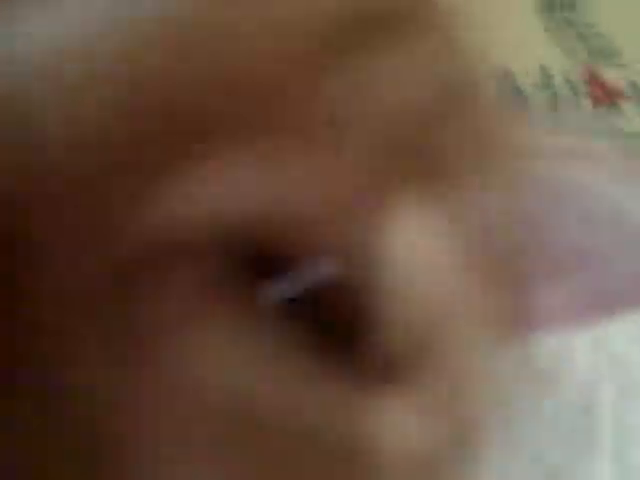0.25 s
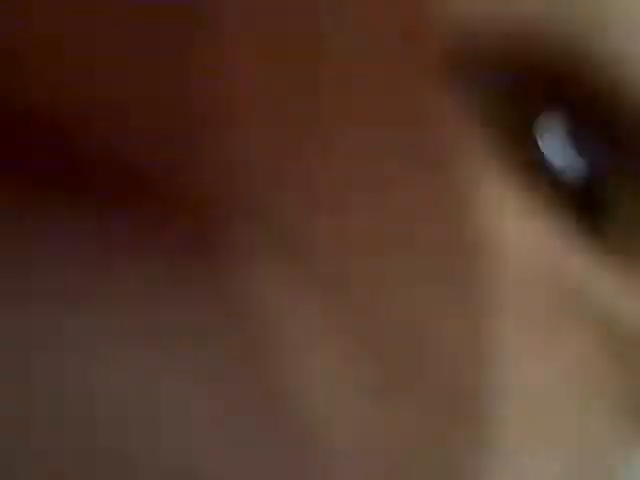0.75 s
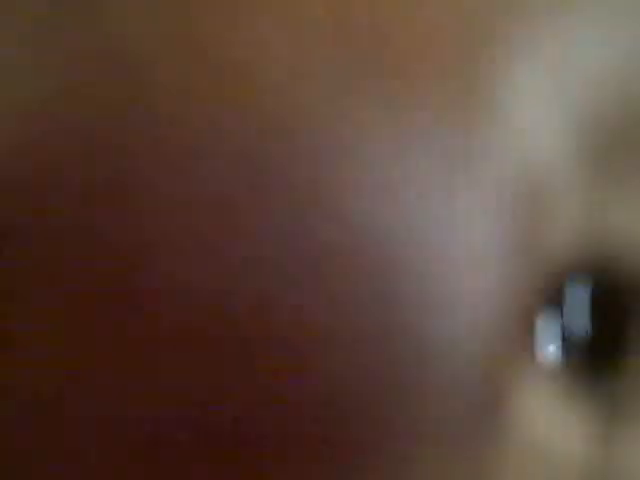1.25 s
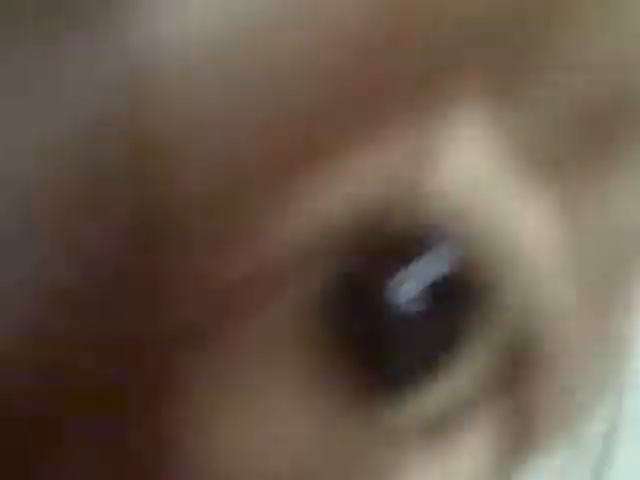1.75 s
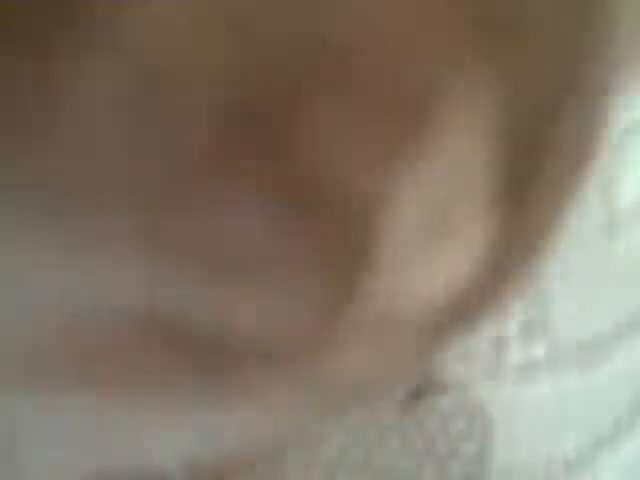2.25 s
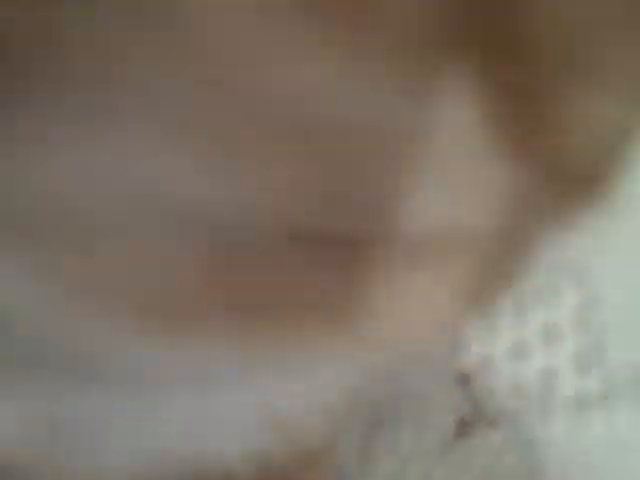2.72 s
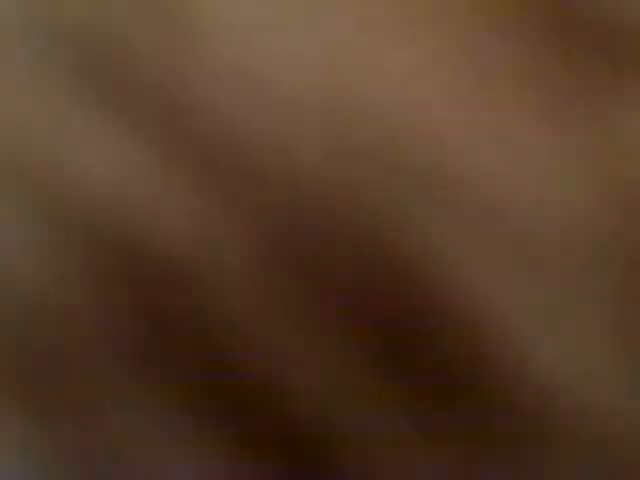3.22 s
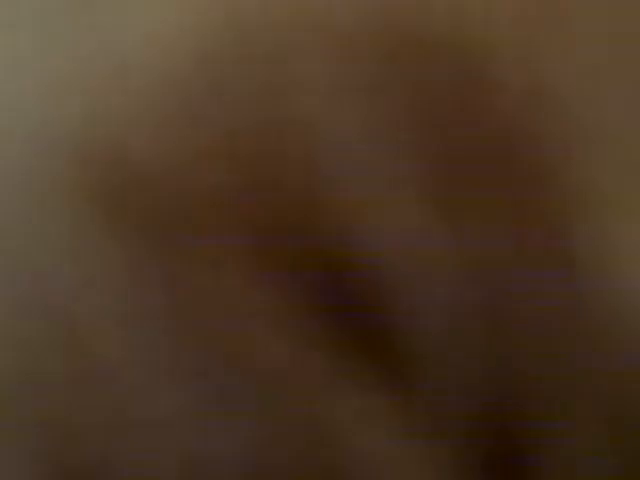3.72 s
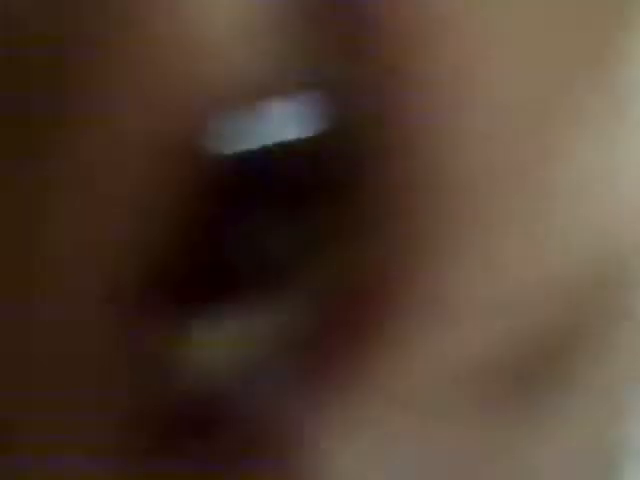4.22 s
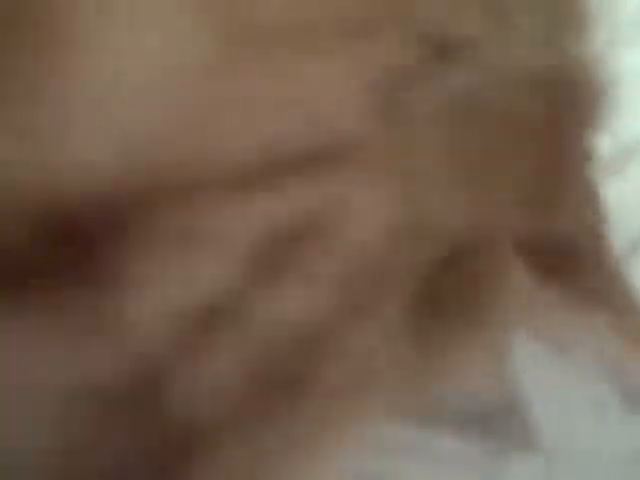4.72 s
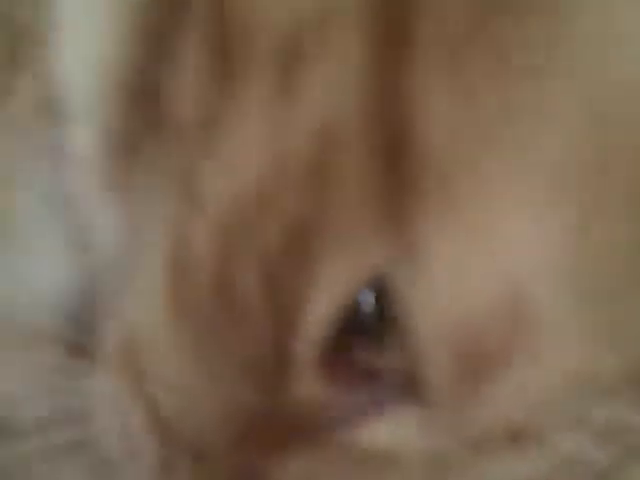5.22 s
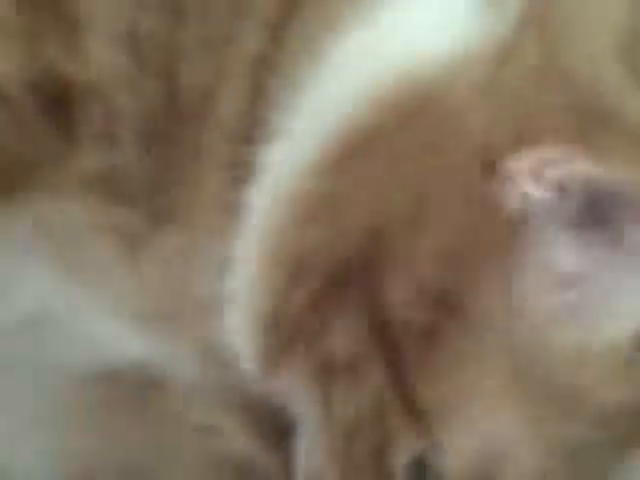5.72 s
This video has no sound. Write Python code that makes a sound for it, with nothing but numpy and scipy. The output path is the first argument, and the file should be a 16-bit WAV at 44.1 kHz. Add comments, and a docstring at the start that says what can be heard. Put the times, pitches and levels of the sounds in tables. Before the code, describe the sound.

Very close cat purring and short sniffs, broken by dull thumps and rubbing as its muzzle nudges the microphone.

```python
"""A cat purrs and sniffs on a bed, its nose almost touching a small camera.
Its larynx chops each breath into puffs that hiss through the nostrils while the chest throbs below.
Nuzzles and one long breath out buffet the microphone; fur scuffs on the case amid tiny bright ticks.
Behind the cat, the hand-held case rumbles and clicks twice over mains hum and a quiet room."""
import sys
import numpy as np
from scipy import signal
from scipy.fft import rfft, irfft, next_fast_len
from scipy.io import wavfile
from scipy.ndimage import map_coordinates

SR = 44100
rng = np.random.default_rng(int(sys.argv[2]) if len(sys.argv) > 2 else 0)


def materialize(psi):
    """Save the field psi as 16-bit PCM at rate SR to the path in sys.argv[1].

    A 1-D psi becomes a single channel; in a 2-D psi each row is a channel.
    """
    bounded = np.clip(np.atleast_2d(psi).T, -1, 1)
    quanta = np.round(bounded * 32767).astype(np.int16)
    wavfile.write(sys.argv[1], SR, quanta)


N = 262836


def amp(db):
    """Decibels to gain."""
    return 10 ** (np.asarray(db) / 20)


def unit(x):
    """x at rms 1."""
    return x / np.sqrt(np.mean(x ** 2) + 1e-20)


def clock():
    """The time of every sample, in seconds."""
    return np.arange(N) / SR


def filtered(x, response):
    """x through a filter given as a complex response of frequency."""
    size = next_fast_len(len(x) + 8192)
    return irfft(rfft(x, size) * response(np.fft.rfftfreq(size, 1 / SR)), size)[:len(x)]


def resonance(f, hz, width):
    """Causal response of one resonance, 1 at its centre."""
    return 1j * f * width / (hz * hz - f * f + 1j * f * width)


def coloured(x, eq):
    """x through an EQ curve of (freq_hz, gain_db) points, at rms 1."""
    hz, db = np.transpose(eq)
    return unit(filtered(x, lambda f: amp(np.interp(np.log(f + 1), np.log(hz), db))))


def noise(eq):
    """Coloured noise of rms 1."""
    return coloured(rng.standard_normal(N), eq)


def wobble(rate):
    """A smooth random curve, rate knots a second."""
    knots = rng.standard_normal(int(N * rate / SR) + 4)
    coarse = np.arange(0, N + 16, 16)
    return np.interp(np.arange(N), coarse, map_coordinates(knots, [coarse * rate / SR], mode="mirror"))


def gate(t, length, edge):
    """1 from t = 0 to length, with soft edges."""
    return (1 + np.tanh(t / edge)) * (1 + np.tanh((length - t) / edge)) / 4


def noise_band(hz, width):
    """Noise of rms 1 in one resonance whose centre may move from sample to sample."""
    phase = 2 * np.pi * np.cumsum(hz) / SR
    slow_noise = lambda: filtered(rng.standard_normal(len(hz)), lambda f: 1 / (1 + 1j * f / width) ** 2)
    return unit(slow_noise() * np.cos(phase) + slow_noise() * np.sin(phase))


def noise_bands(modes, bend):
    """Noise of rms 1 in several resonances that bend together."""
    return unit(sum(amp(db) * noise_band(hz * bend, width) for hz, width, db in modes))


# Room tone and microphone noise: freq_hz, gain_db
FLOOR_EQ = [(15, 0.5), (38, 9), (90, -12), (250, -8), (500, -13), (1000, -20), (1600, -25.5), (3000, -27.5),
            (4600, -28.5), (6300, -20.5), (7500, -25), (9000, -45)]

def room_tone(hum_hz=57.708, hum_db=-43.5, floor_db=-50):
    """Mains hum, slightly unsteady, over quiet room and microphone noise."""
    hum = np.sin(2 * np.pi * hum_hz * clock() + 0.11 * wobble(3)) * amp(.6 * wobble(4))
    return amp(hum_db) * unit(hum) + amp(floor_db) * noise(FLOOR_EQ)


# Low rumble on the microphone, also under the nuzzles and the purr: freq_hz, gain_db
BUFFET_EQ = [(12, -15), (28, -2.5), (60, 2.5), (120, -9), (190, -14.5), (380, -25.5), (1000, -58)]

def handling_rumble(level_db=-51.0, lumps_db=-1.0):
    """The hand holding the camera adds a faint, lumpy rumble."""
    return amp(level_db) * unit(noise(BUFFET_EQ) * amp(lumps_db * wobble(9.7)))


# The camera's case clicks in the hand: start_s, peak_db
CASE_CLICKS = [(4.2784, -20.5), (4.3136, -22)]

def case_clicks(decay_s=0.000701):
    """The case gives: a sudden step of pressure that dies at once."""
    t = clock()
    return sum(amp(peak_db) * (t > start_s) * np.exp(-np.abs(t - start_s) / decay_s)
               for start_s, peak_db in CASE_CLICKS)


# Bright hiss, shared by the fur and the breath: freq_hz, gain_db
HISS_EQ = [(3500, -19), (4800, -9.5), (5400, -5.5), (6100, 3.5), (7000, -0.5), (8000, -12.5), (9000, -24.5)]

def fur_flicks(level_db=-68, flicks_per_s=35, spread_db=2, decay_s=0.00094):
    """Single hairs flick faintly against the case at random."""
    hits = rng.random(N) < flicks_per_s / SR
    flicks = hits * amp(spread_db * np.minimum(rng.standard_exponential(N), 3))
    bursts = signal.lfilter([1], [1, -np.exp(-1 / (decay_s * SR))], flicks)
    return amp(level_db) * unit(bursts * noise(HISS_EQ))


# Tiny bright ticks and short hissy purr puffs: start_s, level_db, pitch_hz, t60_s
TICKS_AND_PUFFS = [(0.31, -32.5, 6780, 0.011), (0.5657, -14, 6079, 0.0042), (0.85, -22, 6470, .014),
                   (0.985, -22, 6362, .005), (1.047, -16.5, 6763, 0.0051), (1.714, -17.5, 3346, 0.0061),
                   (2.863, -27.5, 6300, .008), (4.302, -25.5, 6675, 0.0071), (4.585, -25, 6285, 0.028),
                   (4.606, -35.5, 6179, 0.015), (4.637, -28, 6616, 0.028), (4.660, -27.5, 6198, .03),
                   (5.037, -28.5, 6404, .007), (5.083, -31.5, 2445, 0.017), (5.856, -30, 5838, 0.0092)]

def ticks_and_puffs(trim_db=-2, q=11.0):
    """Tiny bright ticks and short hissy purr puffs, each a noise burst in one broad resonance."""
    out, t = np.zeros(N + SR), np.arange(SR // 20) / SR
    for start_s, level_db, pitch_hz, t60_s in TICKS_AND_PUFFS:
        burst = rng.standard_normal(len(t)) * amp(-60 * t / t60_s)
        ring = filtered(burst, lambda f: resonance(f, pitch_hz, pitch_hz / q))
        out[round(start_s * SR):][:len(t)] += amp(level_db + trim_db) * ring / np.abs(ring).max()
    return out[:N]


# Dull scuff of fur on the case: freq_hz, gain_db
SCUFF_EQ = [(100, 4), (220, 1.5), (300, 5), (400, -1.5), (530, 0), (850, -7.5), (1300, -10.5),
            (3000, -20.5), (4600, -33.5), (6300, -24), (8000, -45)]
# Muzzle or finger drags, bumps and lets go: bump_s, approach_s, release_s, buffet_db, scuff_db
NUZZLES = [(0.339, 0.003976, 0.00734, -59, -30.5), (0.561, 0.00856, 0.1068, -31, -62.5),
           (0.674, 0.02879, 0.007842, -22, -26.5), (0.835, 0.01213, 0.09932, -26, -50),
           (0.938, 0.01121, 0.004696, -24.5, -36), (1.255, 0.017115, 0.01611, -19.5, -51),
           (1.297, 0.06674, 0.0662, -32.5, -40.5), (1.586, 0.002473, 0.0298, -23, -28),
           (1.626, 0.009653, 0.02979, -19.5, -20), (1.668, 0.02218, 0.008766, -20.5, -14),
           (1.721, 0.06, 0.09289, -23, -34.5), (2.35, 0.011, 0.012, -34.5, -59),
           (2.636, 0.003186, 0.1629, -40.5, -53), (3.14, 0.027025, 0.04056, -19, -37.5),
           (3.193, 0.03171, 0.0783, -24, -42), (3.843, 0.008016, 0.04706, -27, -48.5),
           (3.99, 0.09025, 0.02877, -23.5, -44.5), (4.314, 0.00915, 0.00709, -48, -46),
           (4.846, 0.16197, 0.07118, -42.5, -48.5)]

def nuzzles(buffet_trim_db=-1, bump_boost_db=12, grain_db=2.5, fade_db=12, roundness=1.5703,
            push_s=0.0023623, rebound=0.14, rebound_lag=5.3):
    """Fur drags over the case in little slips amid eddies, swelling to a bump on the diaphragm."""
    out, buffet = np.zeros(N), noise(BUFFET_EQ)
    scuff = coloured(rng.standard_normal(N) * amp(grain_db * wobble(400)), SCUFF_EQ)
    for bump_s, approach_s, release_s, buffet_db, scuff_db in NUZZLES:
        t = clock() - bump_s
        away = np.maximum(-t / approach_s, t / release_s)
        press = amp(-fade_db * np.abs(away) ** roundness)
        for layer, db in (buffet, buffet_db + buffet_trim_db), (scuff, scuff_db):
            out += amp(db) * press * layer / layer[away < 1].std()
        push = np.exp(-np.hypot(t / push_s, .2))
        swing_back = rebound * np.exp(-(t / push_s / rebound_lag - 1) ** 2)
        out -= amp(buffet_db + bump_boost_db) * (push - swing_back)
    return out


# Wind on the microphone port: freq_hz, gain_db
BLOW_EQ = [(60, -2), (150, 1.5), (300, -3), (550, -2), (850, -3.5), (1200, -13), (1700, -21.5), (4000, -29)]
# Nasal colour of the breath, here and in the purr: freq_hz, gain_db
NASAL_EQ = [(150, -4.5), (400, -0.5), (680, -7.5), (880, 9), (1080, 1), (1450, -2.5), (2100, 4),
            (3300, 2.5), (3800, -0.5), (4500, -9.5), (8000, -35.5)]
# Fader ride of one long breath out across the camera: time_s, level_db
LONG_BREATH_FADER = [(3.22, -45), (3.426, -39.5), (3.53, -38.5), (3.69, -40.5), (3.79, -69.5)]

def long_breath(blow_db=0.5, gust_db=-1.0, hiss_db=-.5, whistle_db=-9, nasal_db=-11, throb_db=-3,
                purr_hz=32.0, flutter=0.14, whistle_hz=5600):
    """A steady stream of breath hisses and gusts at the microphone port, barely chopped by the purr."""
    t = clock()
    times, levels_db = np.transpose(LONG_BREATH_FADER)
    fader = amp(np.interp(t, times, levels_db)) * gate(t - times[0], times[-1] - times[0], edge=0.0036)
    beat = np.cos(2 * np.pi * purr_hz * t)
    blow = amp(blow_db) * unit(noise(BLOW_EQ) * amp(gust_db * wobble(90)))
    whistle = amp(whistle_db) * noise_band(np.full(N, whistle_hz), width=1300)
    air = amp(hiss_db) * noise(HISS_EQ) + whistle + amp(nasal_db) * noise(NASAL_EQ)
    return fader * (blow + air * (1 + flutter * beat) + amp(throb_db) * beat)


# The chest's throb grows as the cat comes close and fades as the camera draws back: time_s, level_db
CHEST_FADER = [(0, -50), (0.6, -37.5), (1.4, -39.5), (1.8, -30.5), (2.05, -40.5), (2.7, -42), (3.15, -40),
               (3.9, -44.5), (4.5, -41), (4.75, -56), (5.1, -46.5), (5.7, -62.5)]
# What each purr beat rings in chest and throat: pitch_hz, width_hz, gain_db
THROAT_MODES = [(89.6, 110, -3), (182.62, 110, -1.5), (298.9, 70, -2)]
# What each beat rattles in the mouth: pitch_hz, width_hz, gain_db
MOUTH_MODES = [(910.65, 157.67, 0), (2349.3, 200, -1)]
# The nostril jet's near-whistles in a hard sniff: pitch_hz, width_hz, gain_db
WHISTLE_MODES = [(3070.8, 64, -10.5), (4486.7, 93, -7), (5266.8, 30, -0.5), (5656.4, 96, 1.5)]

def purr(breaths, *, slowing_hz_per_s, swell_db_per_s, glide_per_s, snap_cycles, open_phase,
         nasal_db, nasal_growth, ring_db, whistle_db, chest_db, throat_db, buffet_db, mouth_db,
         easy_nostril_hz=3108, nostril_q=9.53, ring_db_per_octave=6.5, ring_loss=0.18,
         easy_breath_db=-50.5, hard_sniff_db=-35, hiss_db=-0.5, scatter_db=2, arch_db_per_s=18):
    """The larynx opens some 28 times a second: each opening puffs through the nose and thumps the chest."""
    out = np.zeros(N)
    eddies = unit(amp(1.8 * wobble(350)))
    hiss, nasal, buffet = noise(HISS_EQ), noise(NASAL_EQ), noise(BUFFET_EQ)
    drift, rasp, quiver = 0.030164 * wobble(25), wobble(500), 0.0507 * wobble(40)
    waver, rattle = .007 * wobble(30), unit(amp(4 * wobble(600)))
    uneven_air = amp(scatter_db * wobble(28))
    chest_fader = amp(np.interp(clock(), *np.transpose(CHEST_FADER)) + scatter_db * wobble(40))
    throat_response = lambda f: sum(amp(db) * resonance(f, hz, width) for hz, width, db in THROAT_MODES)
    for start_s, length_s, strength_db, flutter_db, nostril_hz, purr_hz in breaths:
        near = np.abs(clock() - start_s - length_s / 2) < length_s / 2 + .08
        t = clock()[near] - start_s
        effort_db = strength_db - easy_breath_db
        # long breaths arch more and fade in and out more gently than short sniffs
        along = np.clip(t / length_s, 0, 1) - .5
        arch = amp(length_s * (swell_db_per_s * along + arch_db_per_s * (0.6893 - (2 * along) ** 2)))
        flow = gate(t, length_s, edge=0.0025 + 0.017 * length_s) * arch
        # the beat slows as the breath runs out; each puff swells quickly and dies before the next
        beats = (purr_hz - slowing_hz_per_s * t / 2) * t + drift[near]
        age = (beats - open_phase) % 1 / snap_cycles
        opening = (age * np.exp(1 - age)) ** 3
        # flutter_db counts double in the height of a puff over the steady air
        puffs = unit(1 + amp(2 * flutter_db) * opening) * eddies[near] * uneven_air[near]
        # the nostrils ring, higher and more clearly as they narrow
        ring_hz = nostril_hz * (1 + glide_per_s * length_s * along + quiver[near])
        ring = unit(noise_band(ring_hz, nostril_hz / nostril_q) * (2.4 + opening))
        narrowing_db = ring_db_per_octave * np.log2(nostril_hz / easy_nostril_hz)
        nose = unit(nasal[near] + amp(ring_db + narrowing_db - ring_loss * effort_db) * ring)
        # only the hardest sniffs come close to whistling
        whistle = noise_bands(WHISTLE_MODES, 1 + waver[near])
        jet = unit(hiss[near] + amp(whistle_db + strength_db - hard_sniff_db) * whistle)
        air = puffs * (amp(strength_db + hiss_db) * jet + amp(nasal_db + nasal_growth * effort_db) * nose)
        # the folds snap open roughly, ringing the throat over the chest's throb and the breath's eddies
        snaps = opening ** 4 * (1 + .9 * rasp[near])
        throat = unit(filtered(snaps, throat_response))
        throb = unit(-np.cos(2 * np.pi * beats))
        body = amp(chest_db) * throb + amp(throat_db) * throat + amp(buffet_db) * buffet[near]
        # each opening also rattles in the hollow of the mouth
        chatter = unit(opening ** 2) * rattle[near] * uneven_air[near]
        mouth = amp(mouth_db) * noise_bands(MOUTH_MODES, 1 + quiver[near]) * chatter
        out[near] += flow * (air + chest_fader[near] * (body + mouth))
    return out


# Sniffs and breaths in: start_s, length_s, strength_db, flutter_db, nostril_hz, purr_hz
INHALES = [(0.03, .11, -53.5, 2.5, 2294, 31.23), (0.344, .177, -34.5, 1, 2327, 26.9),
           (0.729, 0.063, -46.5, 3.5, 2364, 29.86), (0.955, 0.039783, -49, 11.5, 3190, 30.9),
           (1.295, .066, -38.5, -9, 3000, 27.5), (1.468, 0.046296, -44, -5, 4470, 25.25),
           (1.70, 0.075, -35.5, -9.5, 3170, 28.72), (1.77, 0.20128, -49.5, -5.5, 2980, 28),
           (2.017, 0.1639, -63, 16.5, 2290, 26.12), (2.44, 0.18, -55, -10.5, 2650, 26.14),
           (2.833, 0.16461, -58, 14, 2424, 26.73), (3.093, 0.024658, -46, 1.5, 2376, 27.01),
           (3.79, 0.026, -51.5, 4.5, 2970, 26.4), (4.089, .13, -61, -2.5, 2070, 25.89),
           (4.358, .26, -52.5, 1.5, 2834, 29.65), (4.92, .15, -47.5, -5.5, 3910, 24.98),
           (5.48, 0.25, -59.5, -7.5, 4150, 26.95)]

def purr_in():
    """Breathing in, the purr is slower and more nasal, and it swells."""
    return purr(INHALES, slowing_hz_per_s=1.2, swell_db_per_s=10.5, glide_per_s=1.3,
                snap_cycles=0.21054, open_phase=0.28001,
                nasal_db=-53.5, nasal_growth=0.94127, ring_db=-3.0, whistle_db=-4.5,
                chest_db=-2.5, throat_db=-10.0, buffet_db=-9.5, mouth_db=-22)


# Breaths out: start_s, length_s, strength_db, flutter_db, nostril_hz
EXHALES = [(0.215, 0.04762, -47, 2, 3100), (0.562, 0.11077, -34, 4.5, 3500), (0.839, 0.08463, -33, 6, 2980),
           (1.248, 0.04109, -37, -1.5, 2900), (1.611, 0.11677, -42.5, 2, 3215),
           (2.252, 0.0766, -44.5, 3.5, 3004), (2.316, 0.04759, -42.5, 3.5, 3152),
           (2.624, 0.18761, -48, 6, 3031), (3.129, .11, -37, 2, 3084), (3.834, 0.24542, -45, -3, 3141),
           (4.623, 0.4039, -55.5, -2, 4280), (5.191, 0.19314, -51.5, -7, 4105),
           (5.708, 0.2905, -54.5, -2, 3600)]

def purr_out(start_purr_hz=31):
    """Breathing out, the purr starts fast and fades, and its air pushes on the microphone."""
    breaths = [(*row, start_purr_hz) for row in EXHALES]
    return purr(breaths, slowing_hz_per_s=19, swell_db_per_s=-36.5, glide_per_s=0.65,
                snap_cycles=0.18001, open_phase=0.28669,
                nasal_db=-61.0, nasal_growth=1.0, ring_db=-3.5, whistle_db=-19.5,
                chest_db=5.0, throat_db=-6.5, buffet_db=-2, mouth_db=-21.5)


def scene():
    """A dry mono mix: everything is so close, and the bedding so soft, that no echo is heard."""
    breath = purr_in() + purr_out() + long_breath()
    foley = nuzzles() + ticks_and_puffs() + case_clicks() + fur_flicks()
    background = handling_rumble() + room_tone()
    return (breath + foley + background)[None]


def record(dry, overload=0.85, low_cut_hz=8, high_cut_hz=8400, stop_hz=9300):
    """The microphone rounds off the hardest bumps; the camera cuts the deepest rumble and the top end."""
    def band(f):
        low_cut = 1j * f / (1j * f + low_cut_hz)
        high_cut = (f < stop_hz) / np.sqrt(1 + (f / high_cut_hz) ** 50)
        return low_cut * high_cut
    return np.array([filtered(overload * np.tanh(channel / overload), band) for channel in dry])


dry = scene()
out = record(dry)
materialize(out)
```